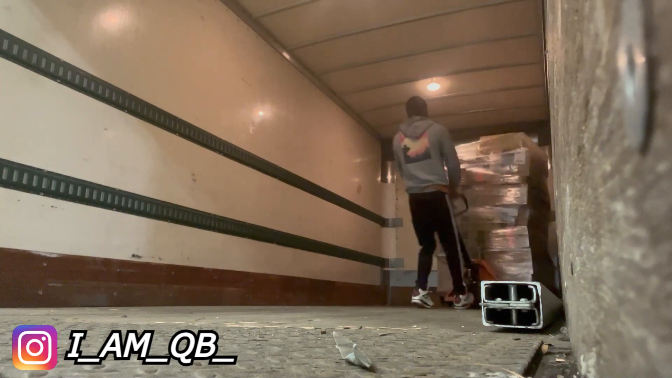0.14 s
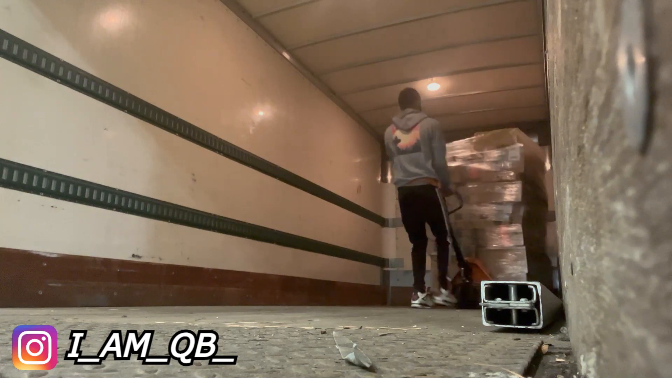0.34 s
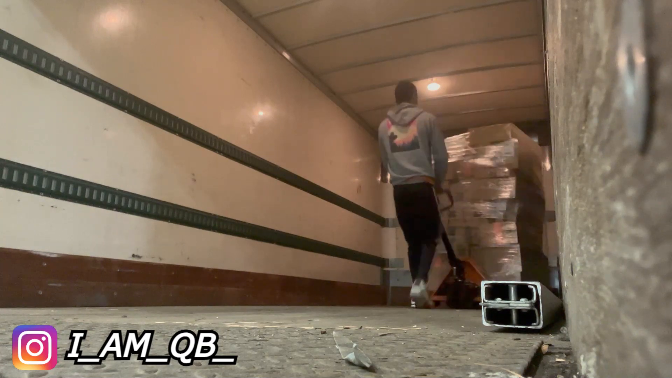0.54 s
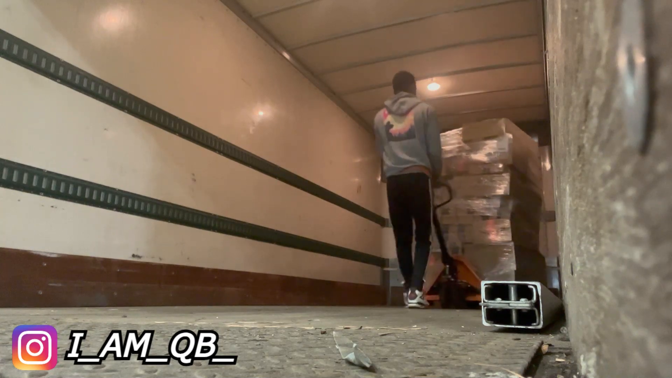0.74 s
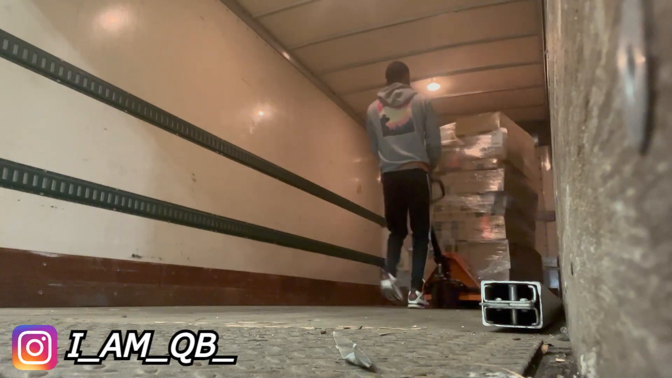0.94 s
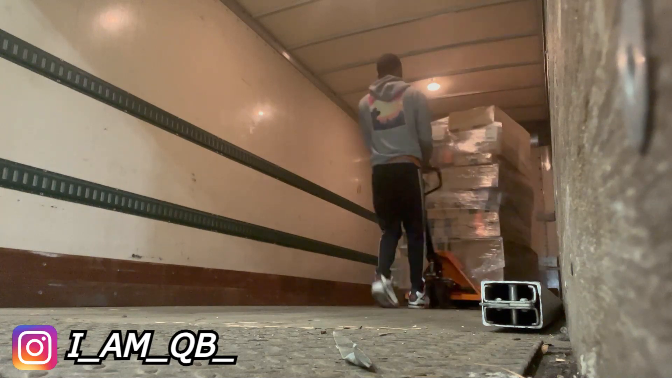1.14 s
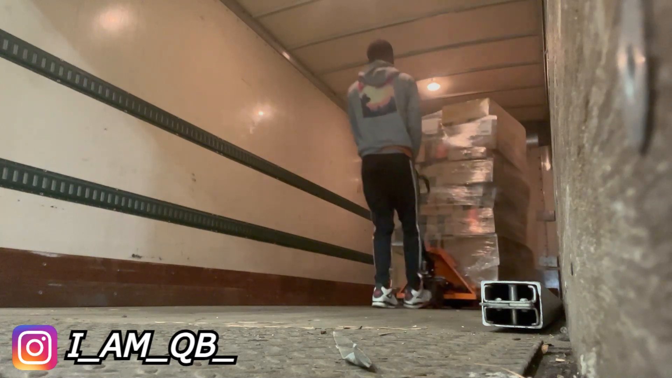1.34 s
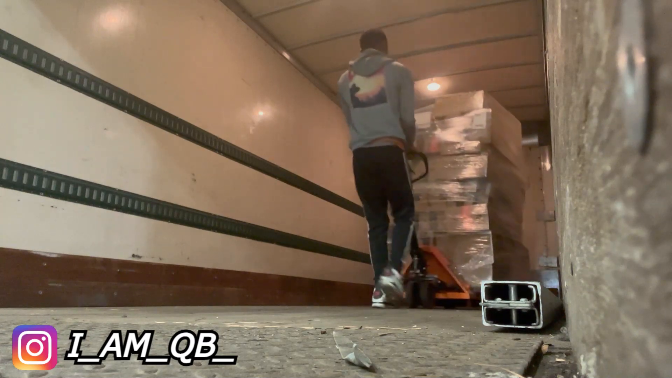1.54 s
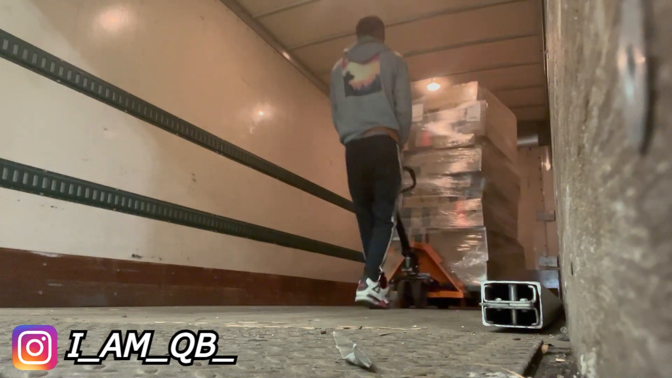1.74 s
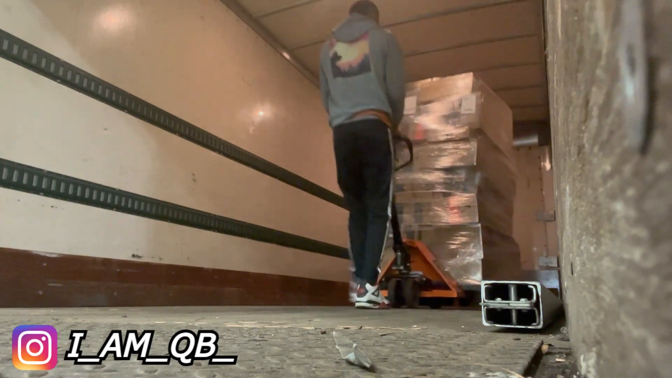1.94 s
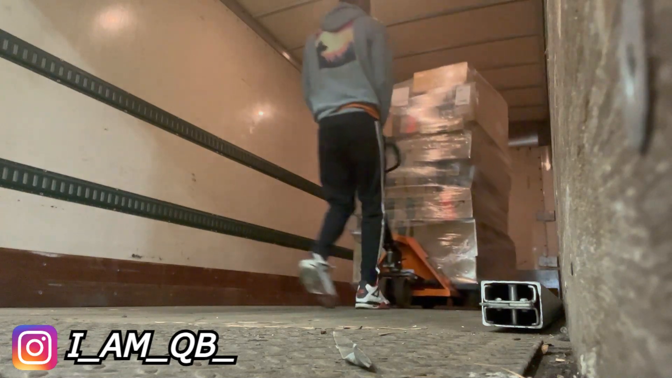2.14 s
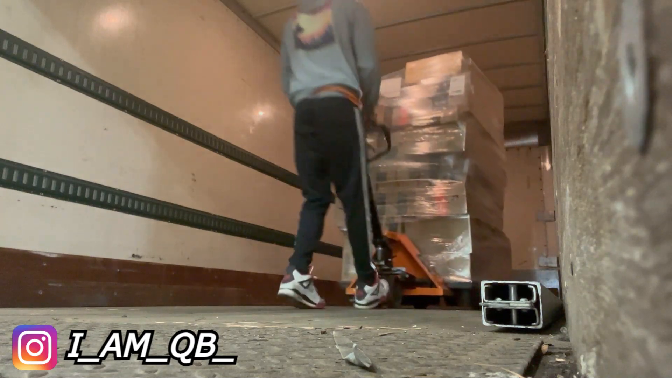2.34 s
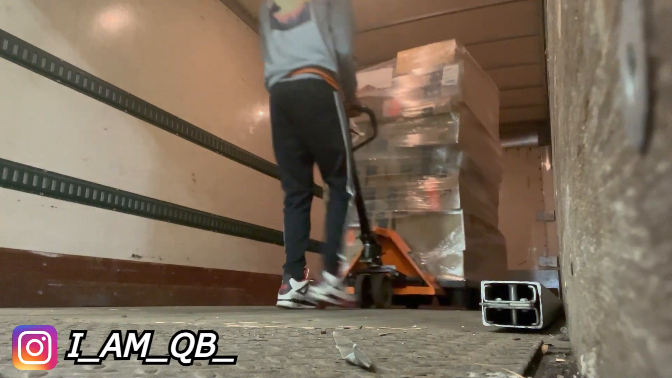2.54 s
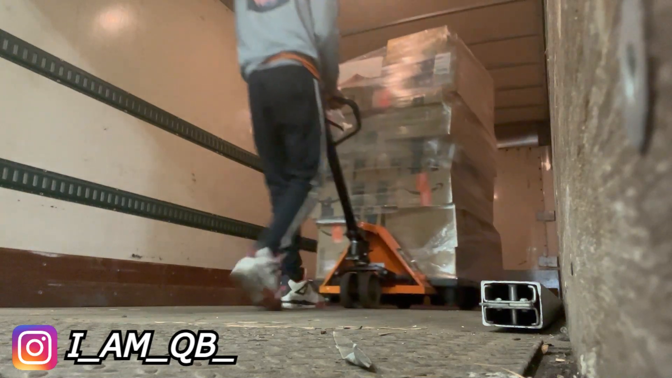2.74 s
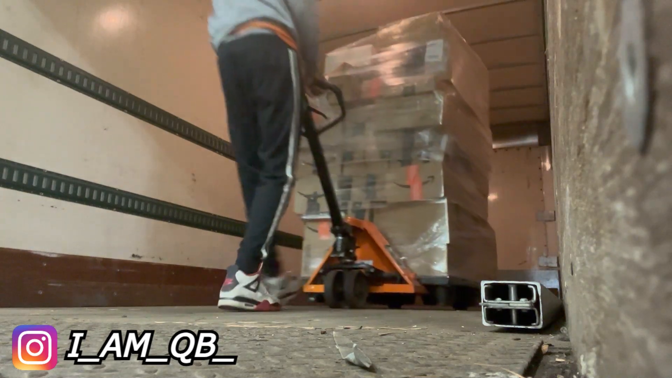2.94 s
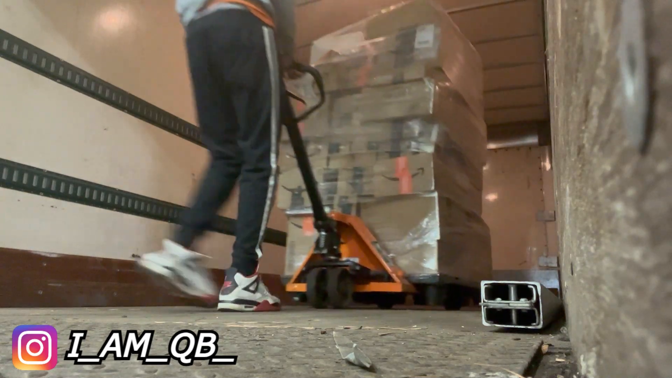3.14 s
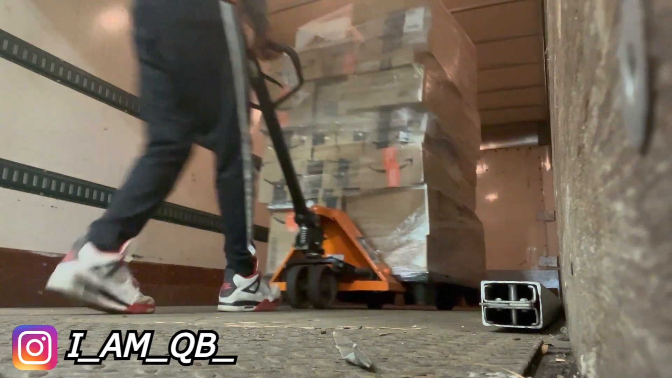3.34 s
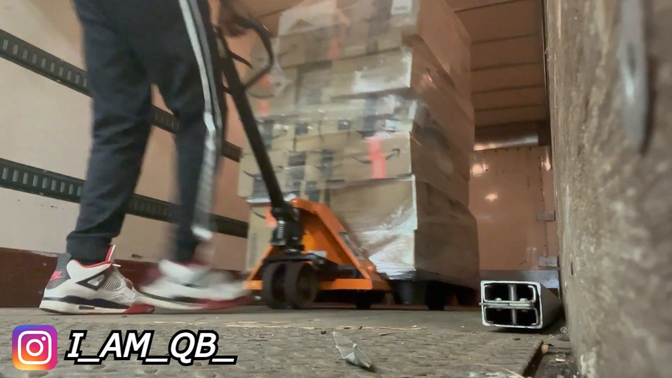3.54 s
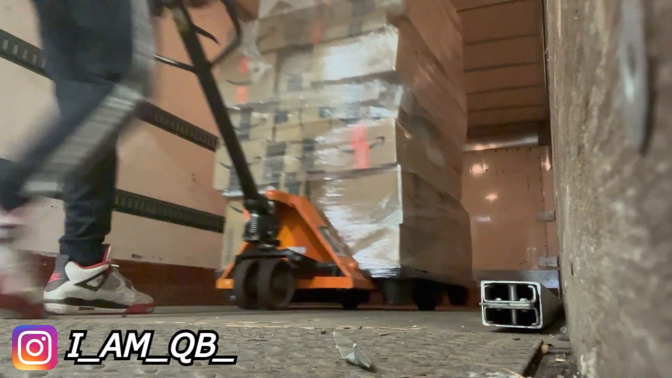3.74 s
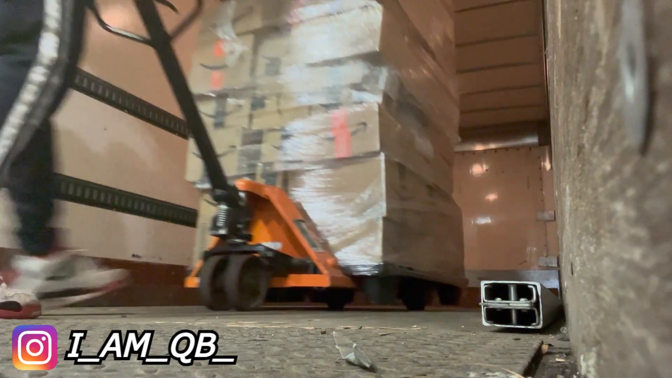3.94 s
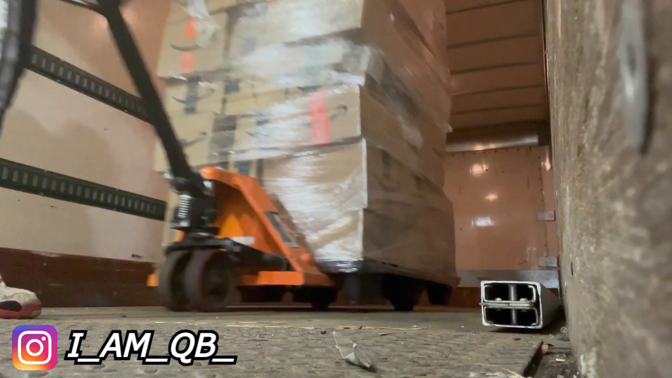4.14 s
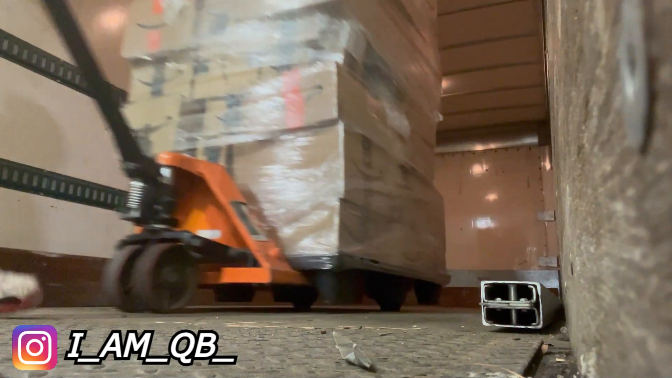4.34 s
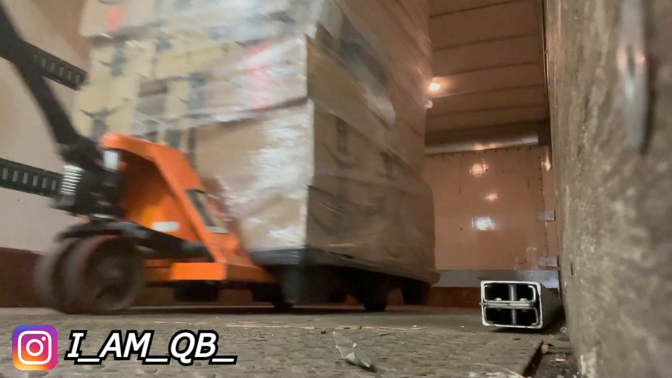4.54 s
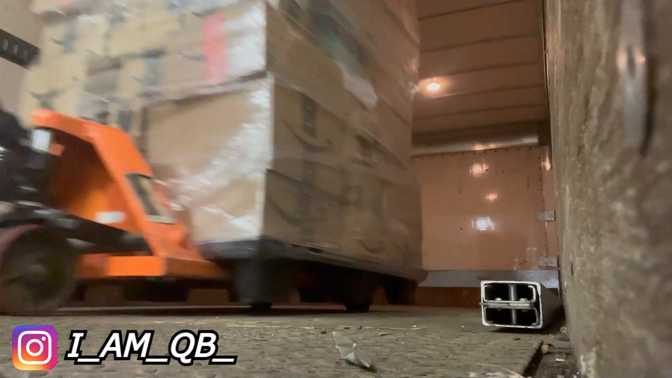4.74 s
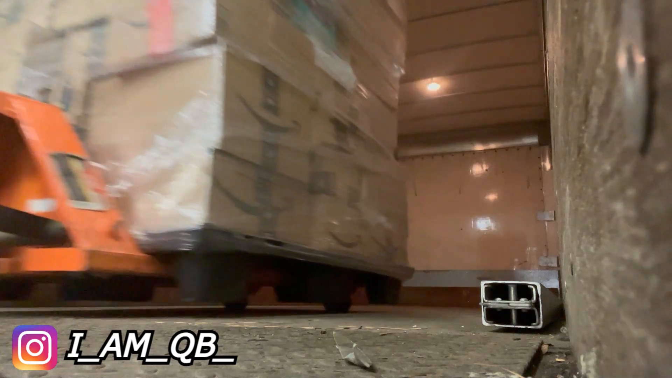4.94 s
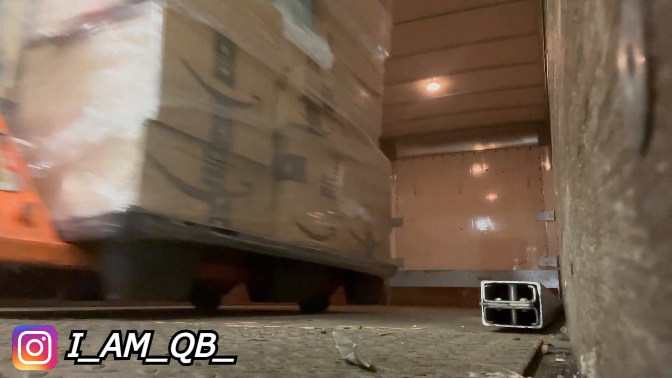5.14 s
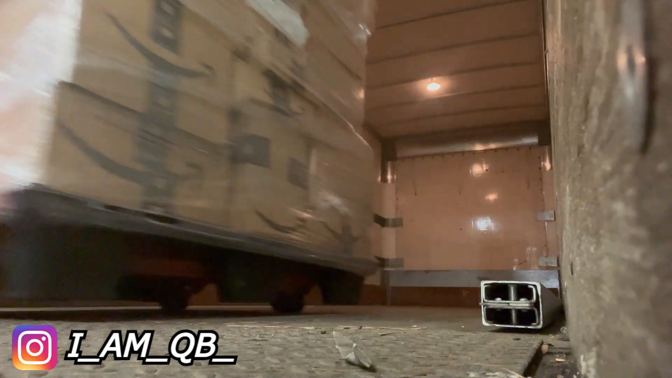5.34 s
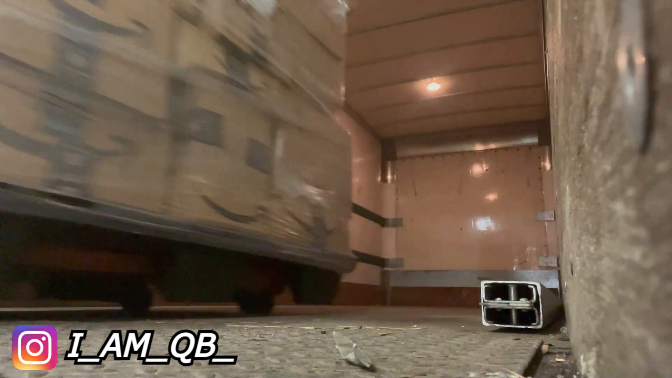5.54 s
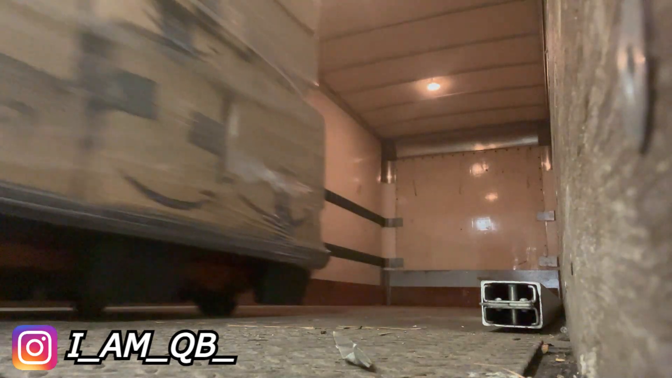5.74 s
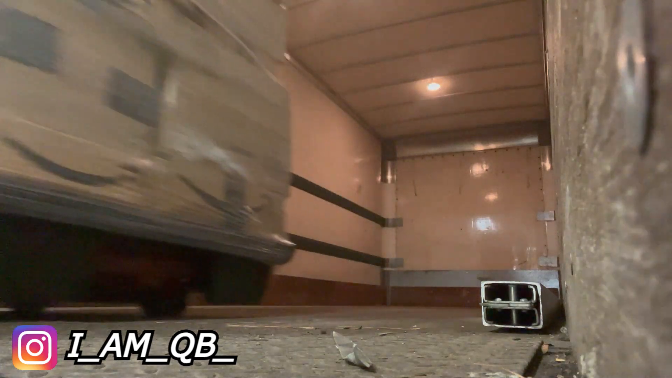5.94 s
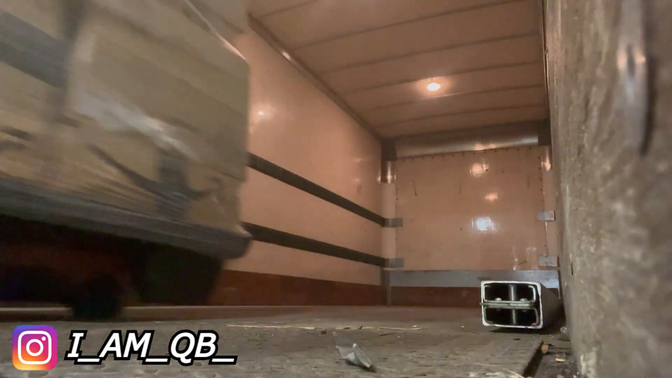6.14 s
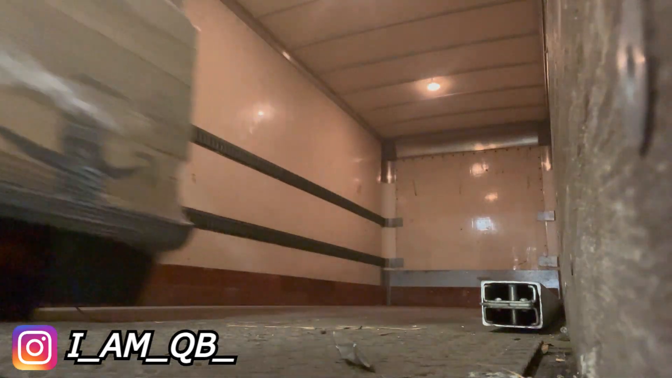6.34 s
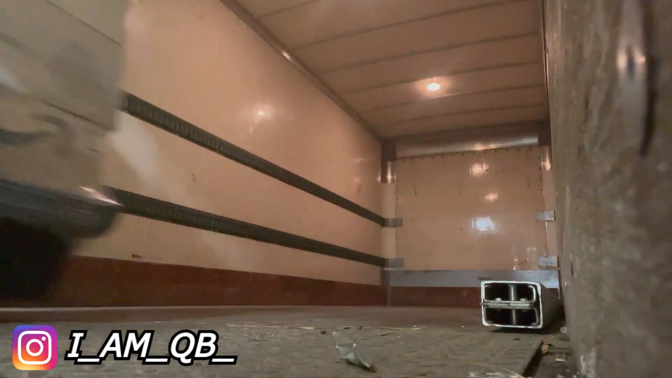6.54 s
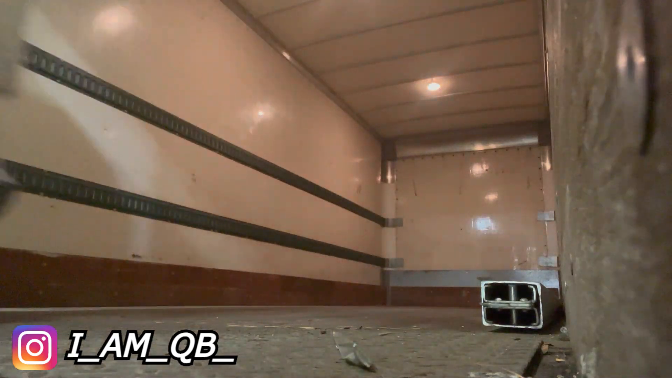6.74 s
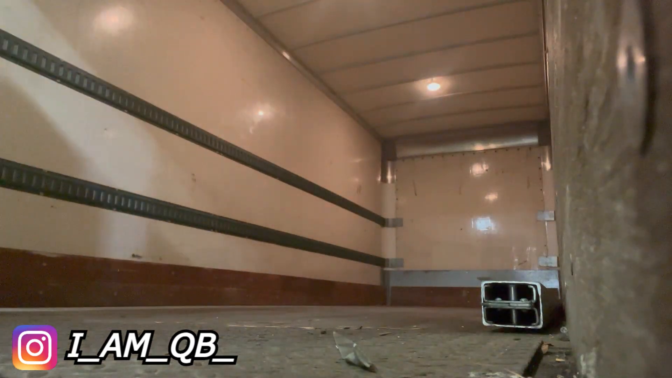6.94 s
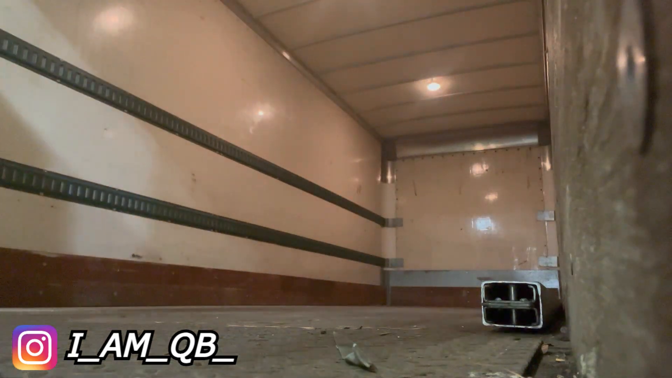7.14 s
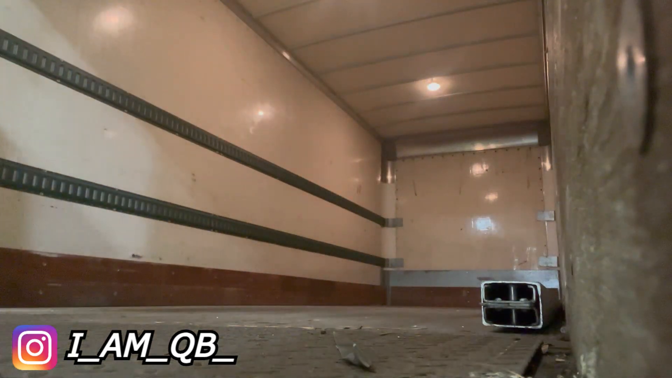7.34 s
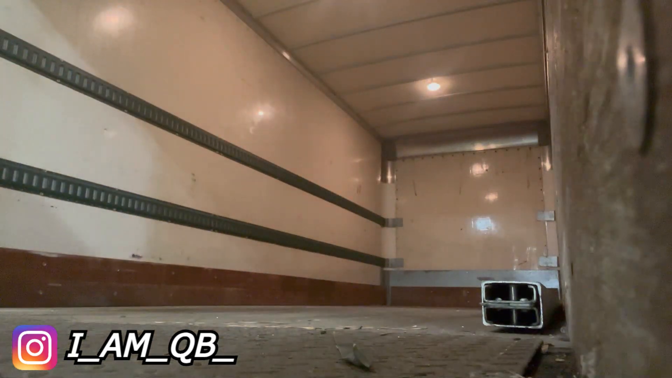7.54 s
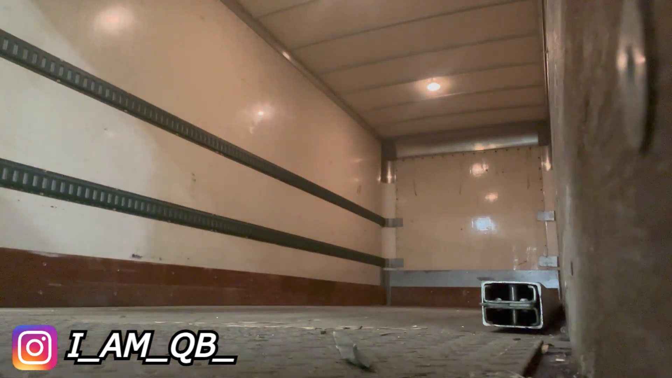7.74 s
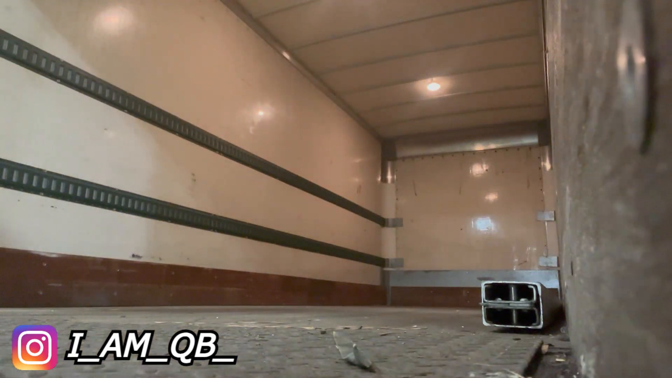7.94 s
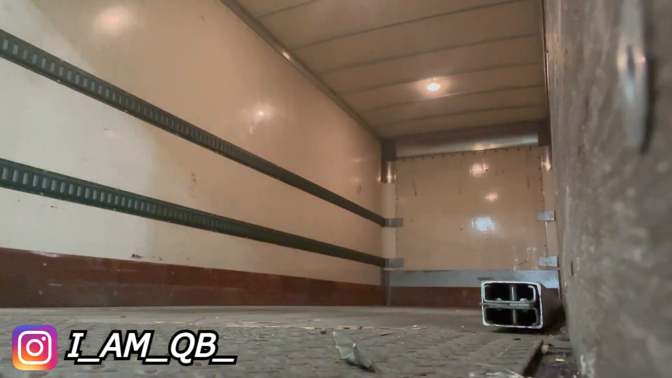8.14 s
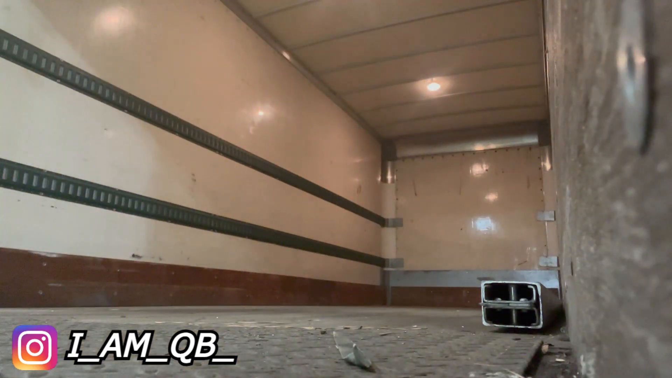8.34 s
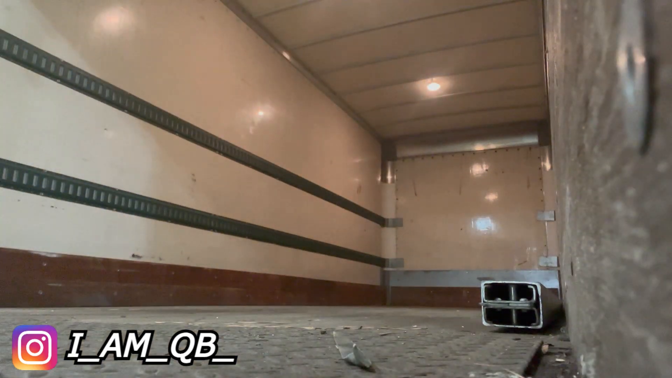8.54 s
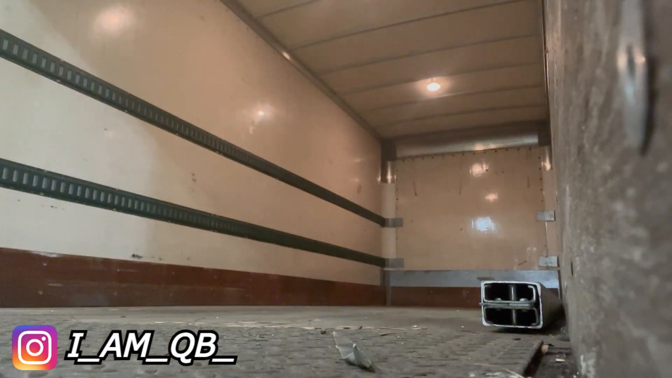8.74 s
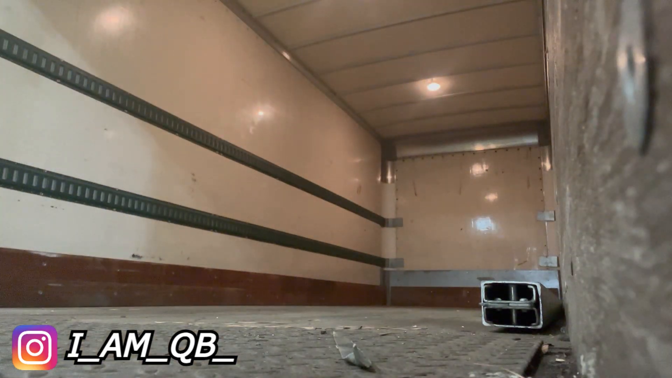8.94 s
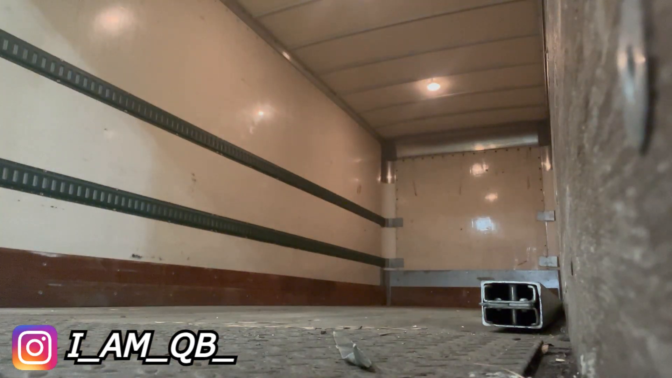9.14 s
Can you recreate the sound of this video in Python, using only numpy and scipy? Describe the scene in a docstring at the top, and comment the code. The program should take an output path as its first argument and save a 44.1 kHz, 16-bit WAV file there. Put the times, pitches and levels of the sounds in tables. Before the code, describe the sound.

A hand pallet jack with a heavy load rolls up a long reverberant trailer towards a microphone near the floor. Wheels rumble low and gritty, one ticking about four times a second, with floor thuds. Around the middle it passes close with hard steel clanks, rattling linkage and floor groans, then bumps out past the microphone and fades. A diesel idles in a low drone under airy hiss.

```python
"""In a long box trailer at a loading yard, a loaded pallet jack rolls past a microphone and out over the tail.
Noise shaped by floor modes is the rumble of its wheels; a flat spot on one wheel ticks once a turn.
Contact forces driven through resonant bodies give thuds at floor joints, fork clanks and linkage rattles.
A dry bearing rasps as wandering narrow-band noise, and groans are brief low tones of the floor.
An idling diesel is a sum of firing orders; yard air is coloured noise; the trailer adds reverberation."""
import sys
import numpy as np
from scipy import signal
from scipy.fft import rfft, irfft, next_fast_len
from scipy.io import wavfile
from scipy.ndimage import map_coordinates

SR = 44100
rng = np.random.default_rng(int(sys.argv[2]) if len(sys.argv) > 2 else 0)


def to_wav(sig):
    """Store sig (one row per channel, or 1-D mono) as 16-bit WAV at the path in sys.argv[1].

    Samples outside -1..1 are clipped; the rate is SR.
    """
    pcm = np.clip(np.atleast_2d(sig), -1, 1) * 32767
    pcm = np.round(pcm).astype(np.int16)
    wavfile.write(sys.argv[1], SR, pcm.T)  # frames by channels


N = 406161
T = np.arange(N) / SR


def amp(db):
    """Level to gain: 20 dB is a factor of ten in amplitude."""
    return 10 ** (np.asarray(db) / 20)


def unit(x):
    """Normalization to an rms amplitude of 1."""
    return x / np.sqrt(np.mean(x ** 2) + 1e-20)


def in_time(rows):
    """Linear interpolation of each column of a curve at every sample."""
    s, *columns = np.transpose(rows)
    return [np.interp(T, s, c) for c in columns]


def at_time(rows, s):
    """Linear interpolation of the first column of a curve at time s."""
    return np.interp(s, *np.transpose(rows)[:2])


def at_hz(points, hz):
    """Interpolation of a spectrum on a logarithmic frequency axis."""
    f, value = np.transpose(points)
    return np.interp(np.log(np.maximum(hz, 1)), np.log(f), value)


def drift(rate):
    """Slow random modulation of rms 1: a smooth curve through random knots, rate of them per second."""
    knots = rng.standard_normal(2000)
    places = np.arange(N // 100 + 2) * 100 * rate / SR
    curve = unit(map_coordinates(knots, [places], mode="wrap"))
    return curve[np.arange(N) // 100]


def swell(attack_s, hold_s, release_s):
    """An envelope with linear attack, hold and exponential decay."""
    t = T[:SR]
    return np.minimum(t / attack_s, 1) * np.exp(-np.maximum(t - attack_s - hold_s, 0) / release_s)


def resonate(x, hz, width):
    """Simple resonance: a two-pole band-pass with a gain near 1 at its top."""
    r = np.exp(-np.pi * width / SR)
    zeros = np.array([1, 0, -1]) * (1 - r * r) / 2
    poles = [1, -2 * r * np.cos(2 * np.pi * hz / SR), r * r]
    return signal.lfilter(zeros, poles, x + 1e-18)


def wandering(x, hz, width, wander):
    """Amplitude modulation of a carrier by low-passed noise; the carrier strays by the share wander."""
    slow = signal.sosfilt(signal.butter(2, width, fs=SR, output="sos"), x)
    return unit(slow) * np.cos(2 * np.pi * hz * np.cumsum(1 + wander * drift(28)) / SR)


def shelf(x, hz, low_db, high_db):
    """First-order crossover with separate gains below and above its corner."""
    low = signal.lfilter(*signal.butter(1, hz, fs=SR), x)
    return amp(low_db) * low + amp(high_db) * (x - low)


def body(x, spectrum, modes=(), size=8192):
    """Impulse response of a struck body: minimum-phase colour plus modes, keeping white-noise power."""
    cepstrum = irfft(np.log(amp(at_hz(spectrum, np.fft.rfftfreq(size, 1 / SR)))))
    # folding the cepstrum onto positive times makes the response causal
    cepstrum[1:size // 2] *= 2
    cepstrum[size // 2 + 1:] = 0
    knock = irfft(np.exp(rfft(cepstrum)))
    for hz, width, lift_db in modes:
        knock = knock + (amp(lift_db) - 1) * resonate(knock, hz, width)
    knock = knock / np.linalg.norm(knock)
    return signal.oaconvolve(np.atleast_2d(x), knock[None], axes=1)[:, :N]


# stereo width of a diffuse field: (frequency [Hz], side minus mid [dB])
FIELD_WIDTH = [(30, -18), (70, -20), (170, -12.5), (290, -8.5), (400, -6.5), (560, -1), (800, 3.5),
               (1200, 1.5), (2000, -1.5), (4500, 1), (12000, 0)]


def diffuse(size=N):
    """Diffuse-field noise at two spaced microphones: coherent in the bass, partly opposed near 800 Hz."""
    padded = next_fast_len(size, True)
    wide = amp(at_hz(FIELD_WIDTH, np.fft.rfftfreq(padded, 1 / SR)))
    mid, side = rfft(rng.standard_normal((2, padded)))
    pair = (mid + wide * side * [[1], [-1]]) / np.sqrt(1 + wide ** 2)
    return irfft(pair, padded)[:, :size]


def contact(chatter_s, snap, lead_s=0.0054, lead_db=-6, lumpy_db=2.5, hops_per_s=900, hop_db=1, size=8192):
    """Contact force of an impact: a swelling scrape, a hard touch (snap), then decaying chatter."""
    touch = size // 8
    t = (np.arange(size) - touch) / SR
    lumps = amp(lumpy_db * np.clip(rng.standard_normal(size // 64), -1.5, 1.5))
    scrape = amp(lead_db) * np.exp(-abs(t) / lead_s)
    chatter = np.exp(-abs(t) / max(chatter_s, .001))
    shape = np.where(t < 0, scrape, chatter)
    hops = unit((rng.random(size) < hops_per_s / SR) * rng.choice([-1, 1], size))
    grain = rng.standard_normal(size) + amp(hop_db) * hops
    force = unit(grain * np.repeat(lumps, 64) * shape) * np.sqrt(np.mean(shape ** 2))
    force[touch] += snap
    return force


def add(track, s, sound, lead=1024):
    """Superposition: mix a sound in so that its sample number lead falls at time s."""
    i = max(round(s * SR) - lead, 0)
    track[i:i + len(sound)] += sound[:N - i]


# spectrum of the yard air: (frequency [Hz], density [dB per Hz])
YARD_SPECTRUM = [(100, -28), (170, 10), (229, 10.5), (822, -10.5), (1030, -2.5), (2160, -25), (3360, -24.5),
                 (4440, -26.5), (4960, -28), (6800, -40), (9860, -56), (14300, -49)]
# hiss in the yard air: (time [s], level relative to the air [dB])
YARD_HISS_LEVEL = [(0, 11), (3, 5.5), (6, 17.5), (8.0, 4), (8.7, 5.5), (9.21, 14.5)]


def yard(air_db=-40, hiss_hz=2800):
    """Ambient noise: spectrally shaped diffuse air with a treble hiss that comes and goes."""
    air = unit(body(diffuse(), YARD_SPECTRUM))
    return amp(air_db) * shelf(air, hiss_hz, 0, at_time(YARD_HISS_LEVEL, T))


# drone of the idling engine, with dips near 6 and 7 s: (time [s], level [dB])
DRONE_LEVEL = [(0, -24), (3.5, -22), (5.75, -24), (5.92, -34), (6.25, -26.5), (7.08, -24), (7.22, -39),
               (7.54, -27.5), (9.21, -29)]
# harmonic orders of the firing rate: (multiple, relative level [dB])
FIRING_ORDERS = [(1, -18.5), (2, 0), (3, -3), (4, -6.5), (5, -16.5)]


def engine(firing_hz=30.04, waver_db=1.36, unsteady=0.00407):
    """Harmonic series of a diesel's firing rate; dispersed phases smear the firings into an even drone."""
    level, = in_time(DRONE_LEVEL)
    turn = 2 * np.pi * np.cumsum(firing_hz * (1 + unsteady * drift(4))) / SR
    orders = np.zeros(N)
    for k, db in FIRING_ORDERS:
        strength = amp(db + waver_db * drift(5.4))   # each order swells on its own
        orders += strength * np.sin(k * turn + np.pi * k ** 2 / 2)
    return np.sqrt(2) * amp(level) * orders


# reverberation of the trailer: (frequency [Hz], decay time for 60 dB [s])
REVERBERATION_TIME = [(60, 1), (250, 0.29), (800, 1), (1700, 0.79), (4000, 0.69), (8000, 0.7),
                      (15000, 0.18)]


def trailer(x, build_s=0.0011, early_db=4, early_s=0.02, count=7):
    """Reverberation: strong early sound, then band-wise decay; the echo pattern changes as the jack moves."""
    t, hz, centres = T[:SR], np.fft.rfftfreq(SR, 1 / SR), np.geomspace(60, 15000, 9)
    bands = np.array([at_hz(np.c_[centres, share], hz) for share in np.eye(len(centres))])
    decays = np.exp(-np.log(1000) * t / at_hz(REVERBERATION_TIME, centres)[:, None])
    decays = decays * (1 - np.exp(-t / build_s)) * (1 + amp(early_db) * np.exp(-t / early_s))
    out = np.zeros((2, N + SR))
    for place in np.eye(count):
        # crossfade from one place's response to the next
        near = np.interp(T, np.linspace(0, T[-1], count), place)
        tail = (irfft(rfft(diffuse(size=SR))[:, None] * bands, SR) * decays).sum(axis=1)
        echo = signal.fftconvolve((x * near)[:, near > 0], unit(tail) / np.sqrt(SR), axes=1)
        start = np.argmax(near > 0)
        out[:, start:start + echo.shape[1]] += echo
    return out[:, :N]


def passing(x, lag_ms):
    """Interaural-type time difference: direct sound reaches the nearer side first (positive: right)."""
    lag = lag_ms * SR / 1000
    return np.array([map_coordinates(x, [np.arange(N) - side * lag / 2], order=2) for side in (1, -1)])


# rattles of handle and linkage: (time [s], relative level [dB], chatter [s], brightness [dB])
RATTLE_EVENTS = [(0.4762, -39.5, 0.014, -10.5), (.585, -49, .02, -8), (0.7548, -38, 0.015, 0),
                 (1.605, -33.5, 0.026, 4), (3.75, -37, 0.0064, 13), (4.5014, -25, 0.015, 1.5),
                 (4.838, -21.5, 0.0057, -8), (5.604, -33, 0.0084, 7), (5.62, -23.5, 0.0034, 0),
                 (5.751, -23.5, 0.0056, 1), (5.8293, -26.5, 0.0021, 14), (5.858, -36, 0.017, 0),
                 (6.409, -28.5, 0.011, 2.5), (6.929, -50, .006, -6), (6.953, -23, 0.0011, 4),
                 (7.138, -34.5, 0.0096, 15.5), (7.577, -35.5, 0.0037, -3), (7.667, -38.5, 0.013, 1),
                 (8.142, -48, .005, -5), (8.206, -47, 0.0055, -4), (8.254, -38, 0.014, -2),
                 (8.329, -47, .004, -6), (8.366, -38, 0.0037, -9)]
# colour of the linkage: (frequency [Hz], relative level [dB])
LINK_COLOUR = [(700, -20.5), (1700, 9.5), (2200, -2), (3100, 5), (3600, 0), (4300, 5.5), (5500, -4.5),
               (6500, -9), (7800, -24), (9300, -10), (12000, -23), (15000, -26.5)]
# modes of the linkage: (frequency [Hz], width [Hz], lift [dB])
LINK_RESONANCES = [(3300, 18, 2), (4040, 62, 3.4), (4470, 24, 2.7), (5050, 66, 3.5)]


def rattles(snap=5.8, gain_db=-3):
    """Repeated micro-impacts: loose pins of the handle chatter in their holes and excite the linkage."""
    force = np.zeros(N)
    for s, db, chatter_s, bright_db in RATTLE_EVENTS:
        add(force, s, amp(db) * shelf(contact(chatter_s, snap), 9600, -bright_db / 2, bright_db))
    return amp(gain_db) * body(force, LINK_COLOUR, LINK_RESONANCES)


# lift-linkage pins striking home:
# (time [s], relative level [dB], pitch [Hz], ring relative to the crack [dB], ring decay [s])
CLINK_EVENTS = [(0.488, -37, 3337, 3, 0.019), (0.498, -47, 3810, 5, 0.013), (0.873, -39, 2990, 4, .025),
                (0.89, -40, 3300, 1, 0.013), (1.632, -40, 3330, 2, .01), (1.611, -37, 4030, 0, .02),
                (4.6088, -25, 2910, 4, .006), (4.8378, -29, 4350, 14, 0.0065), (4.865, -27, 4100, -1, .005),
                (5.09, -28, 4240, -1, .006), (5.6215, -24, 4130, -7, 0.0053),
                (5.7046, -20.5, 2940, 8.5, .004), (5.718, -23, 2830, 7, .005), (5.749, -17, 2880, -1, .005),
                (5.759, -34, 3060, 15, .005), (5.7686, -28.5, 3910, 7, 0.0075),
                (5.78, -31, 4360, 14.5, 0.0036), (5.829, -18.5, 4630, 4, .003),
                (6.953, -28, 4320, 2.5, 0.0066), (7.669, -36, 4230, -5, 0.0055),
                (7.646, -30, 4400, -13, .006), (8.1107, -45, 4160, -1, .005), (8.1415, -41, 4800, 4, .003),
                (8.2, -37, 4270, -3, .003), (8.2094, -42, 4900, 0, .003), (8.269, -29, 4300, -2, 0.0041)]


def clinks(crack_s=0.0014, snap=2.8):
    """Free vibration after impact: a pin cracks on the linkage and rings briefly at its own pitch."""
    force, ring, t = np.zeros(N), np.zeros(N), T[:SR // 2]
    for s, db, hz, ring_db, ring_s in CLINK_EVENTS:
        add(force, s, amp(db) * contact(crack_s, snap, lead_db=-25))
        tone = np.sin(2 * np.pi * hz * t) * np.exp(-t / ring_s)
        add(ring, s, amp(db + ring_db) * tone, lead=0)
    return ring + body(force, LINK_COLOUR, LINK_RESONANCES)


# blows of the steel forks: (time [s], relative level [dB], treble [dB], chatter [s], relative blade ring [dB])
CLANK_EVENTS = [(4.8618, -6.5, 0, 0.0026, 4.5), (4.877, -12, 0, 0.0023, 3), (4.898, -21, 1, .003, -12),
                (4.92, -17, 0, 0.0069, -19), (4.955, -25, 9, 0.0091, -10), (4.94, -23, 1, 0.0034, -10),
                (5.621, -16, -9, 0.004, -6), (5.714, -9.5, -5, 0.012, -5), (5.749, -12.5, -3, 0.0055, 2),
                (5.7664, -22, -2, 0.0051, 14), (5.83, -7.5, 0, 0.0031, 2.5),
                (5.8616, -10.5, -18, 0.018, -6), (6.382, -14, -14, 0.0027, -11),
                (6.43, -29.5, 15.5, 0.012, 8.5), (6.516, -16.5, 2, 0.015, 0.5),
                (6.5455, -18.5, -7, 0.024, -3), (7.3459, -14, 4, 0.0045, -0.5),
                (7.3655, -17, -9, 0.003, -1), (7.378, -27, -2.5, 0.16, -14), (7.696, -34.5, -2, 0.028, 7),
                (8.0617, -32.5, -7, 0.0049, 7), (8.2595, -18, 7.5, 0.013, -4),
                (8.2762, -16.5, -1, 0.011, 2), (8.303, -18, 2, 0.015, -7), (8.329, -19.5, 1, 0.008, -5),
                (8.345, -19.5, 3.5, 0.0072, -10), (8.364, -25, 1, 0.055, -10)]
# colour of the forks: (frequency [Hz], relative level [dB])
FORK_COLOUR = [(120, -16), (300, 2.5), (620, 5.5), (800, 4.5), (1100, -2.5), (1300, -2), (1800, -14),
               (2150, -18.5), (2800, -15), (3400, -16), (4600, -20), (5700, -26), (8500, -38.5),
               (15000, -47)]
# modes of the forks: (frequency [Hz], width [Hz], lift [dB])
FORK_RESONANCES = [(613, 120, 4.4), (2200, 45, 5.1), (3370, 35, 2.1), (4370, 60, 3), (4460, 36, 2.8)]
# ring of the fork blades: (frequency [Hz], width [Hz], relative level [dB])
BLADE_MODES = [(890, 98, -4.5), (1130, 100, -15), (1385, 43, -8), (1533, 72, 0.5), (1728, 120, 4),
               (1806, 208, -1), (2310, 140, -13.5)]


def clanks(snap=6.9, square_snap=11.6, lead_db=-13, square_db=-4.0, gain_db=-2, ring_db=11):
    """Modal excitation: the forks jump and strike steel; a square blow sets their blades ringing."""
    force, square = np.zeros(N), np.zeros(N)
    for s, db, treble_db, chatter_s, blade_db in CLANK_EVENTS:
        blow = contact(chatter_s, snap, lead_s=0.0043, lead_db=lead_db)
        add(force, s, amp(db) * shelf(blow, 2800, 0, treble_db))
        square_blow = contact(chatter_s, square_snap, lead_s=0.0034, lead_db=lead_db)
        add(square, s, amp(db + blade_db + square_db) * square_blow)
    ring = np.zeros(N)
    for k, (hz, width, db) in enumerate(BLADE_MODES):
        ring += (-1) ** k * amp(db) * resonate(square, hz, width)
    return amp(gain_db) * body(force, FORK_COLOUR, FORK_RESONANCES) + amp(ring_db) * ring


# bands of the rasp: (frequency [Hz], width [Hz], relative level [dB])
RASP_BANDS = [(11650, 110, 5), (11550, 130, 0.5), (11900, 110, -3.5), (12200, 1100, 4.5), (14200, 200, -16)]
# catches of the dry bearing: (time [s], length [s], rasp level [dB], whistle relative to the rasp [dB])
RUB_EVENTS = [(0.184, 0.039, -73, 18), (0.69, 0.066, -63, 13), (0.948, 0.021, -53, 6),
              (4.974, 0.069, -40.5, -1), (5.12, 0.25, -60, -10), (5.31, 0.47, -58, 6),
              (5.665, 0.027, -39.5, -1), (5.728, .005, -44, -10), (6.314, 0.25, -56, -11)]


def bearing(flutter_db=1.5, whistle_hz=4980, whistle_width=200, attack_s=0.004, release_s=0.06,
            running_db=-57, running_whistle_db=-49, turn_db=-44, turn_hold_s=.025, wander_db=5, stray=0.0072):
    """Dry friction: a high unsteady rasp over a thin whistle, following the load and its catches."""
    load = at_time(FLOOR_DRIVE, T) + wander_db * drift(6.5)
    grip, squeal = amp(load + running_db), amp(load + running_whistle_db)
    for s, length, db, whistle_db in RUB_EVENTS:
        catch = amp(db) * swell(attack_s, length, release_s)
        add(grip, s, catch, lead=0)
        add(squeal, s, amp(whistle_db) * catch, lead=0)
    for s, db, *_ in TICK_EVENTS:   # every tick also loads the bearing a little
        add(grip, s, amp(db + turn_db) * swell(attack_s, turn_hold_s, release_s), lead=0)
    grain = unit(amp(flutter_db * drift(120)))
    rasp = sum(amp(db) * wandering(rng.standard_normal(N), hz, width, stray) for hz, width, db in RASP_BANDS)
    whistle = wandering(rng.standard_normal(N), whistle_hz, whistle_width, stray)
    return grain * (grip * unit(rasp) + squeal * unit(whistle))


# groans of the loaded floor: (centre time [s], length [s], frequency [Hz], level [dB])
GROAN_EVENTS = [(2.853, 0.31, 136, -27), (2.942, 0.26, 326, -27.5), (4.395, 0.19, 159, -32),
                (4.516, 0.14, 179, -17), (5.345, 0.068, 66.5, -15.5), (6.305, 0.078, 55.2, -18),
                (6.631, 0.43, 109.3, -21.5), (7.027, 0.16, 109.3, -18), (8.02, 0.18, 72, -17.5)]


def groans(waver=0.01615):
    """Forced vibration of one floor mode: a low tone under a Gaussian envelope, slightly unsteady in pitch."""
    out, sway = np.zeros(N), np.cumsum(1 + waver * drift(11)) / SR
    for s, length, hz, db in GROAN_EVENTS:
        near = abs(T - s) < 2 * length
        envelope = np.exp(-(2 * (T[near] - s) / length) ** 2)
        out[near] += np.sqrt(2) * amp(db) * envelope * np.sin(2 * np.pi * hz * sway[near])
    return out


# touches of the flat spot, once a turn:
# (time [s], relative level [dB], ring pitch [Hz], scrape before [s], chatter after [s], treble [dB])
TICK_EVENTS = [(0.8571, -35.5, 2980, 0.0014, 0.032, 4), (1.123, -42, 2470, .005, .022, 2),
               (1.379, -56, 2680, .005, 0.016, -4), (1.630, -39, 2820, 0.0034, .016, 5),
               (1.8814, -35.5, 2850, 0.0025, .015, -7.5), (2.134, -37, 2650, 0.0026, 0.025, 5),
               (2.388, -46.5, 2750, 0.008, 0.015, -9), (2.635, -29.5, 2730, 0.0039, 0.014, -1.5),
               (2.889, -25.5, 2750, 0.0039, 0.0066, 2), (3.141, -22, 2815, 0.0018, 0.0058, 5),
               (3.388, -27.5, 2870, .003, 0.023, 2), (3.632, -26.5, 2660, 0.0027, 0.013, 0),
               (3.874, -31, 2700, 0.0041, 0.015, -13.5), (4.115, -20, 2920, 0.0024, 0.015, -2.5),
               (4.355, -19.5, 2780, 0.0018, 0.0067, 1), (4.596, -21.5, 2890, 0.0017, 0.0087, 8),
               (4.8396, -25, 2870, .003, 0.0062, -6), (5.087, -28.5, 2660, .002, 0.0064, -1),
               (5.354, -33, 2730, 0.01, 0.0092, -7), (5.62, -31, 2850, 0.0058, .01, 0)]
# colour of the wheel: (frequency [Hz], relative level [dB])
WHEEL_COLOUR = [(300, -11.5), (800, -3.5), (1300, 5), (1800, 1), (2120, -13), (2750, 0.5), (3150, -1.5),
                (3650, -7.5), (4300, -6), (5200, -11.5), (7200, -36), (8700, -33), (11000, -31),
                (15000, -61)]
# modes of the wheel: (multiple of the ring pitch, width [Hz], lift [dB])
WHEEL_MODES = [(.79, 40, 8.5), (1, 90, 8.5), (1.09, 90, -0.5), (1.165, 70, 2), (1.48, 220, 6),
               (1.61, 160, 1)]


def ticks(snap=7.9, low_ring_db=-15, low_follows=0.42, rebound_s=.014, rebound_db=-8):
    """Impact and rebound once a turn: a bright tick over a low ring that grows more slowly with strength."""
    out = np.zeros(N)
    for s, db, pitch, scrape_s, chatter_s, treble_db in TICK_EVENTS:
        strike, rebound = (contact(chatter_s, snap, lead_s=scrape_s, lead_db=0, hops_per_s=500, hop_db=0)
                           for _ in range(2))
        delay = round(rebound_s * rng.uniform(.7, 1.6) * SR)
        force = strike + amp(rebound_db) * np.roll(rebound, delay)
        force = shelf(force, 1300, low_ring_db + low_follows * db, db)
        force = shelf(force, 4500, -treble_db / 2, treble_db)
        modes = [(k * pitch, width, lift_db) for k, width, lift_db in WHEEL_MODES]
        add(out, s, body(force, WHEEL_COLOUR, modes)[0])
    return out[None]


# wheels striking the floor, at joints and as strong flat-spot thumps just before some ticks: # (time [s],
# relative level [dB], panel pitch [Hz], relative deep boom [dB], relative hard slap [dB])
FLOOR_BLOWS = [(.2675, -22, 397, -10, 6.5), (.322, -30, 231, -9, 7), (1.095, -23.5, 344, -17, 8),
               (1.348, -25, 307, -5, 3), (1.619, -13, 286, -10, -4.5), (2.336, -18.5, 239, -11, -4.5),
               (2.612, -24, 262, 1, 4.5), (2.882, -19, 301, -14, -1.5), (3.865, -19, 227, -9, -7.5),
               (4.281, -25, 254, -4, 6), (4.333, -18.5, 244, 11, 3), (4.496, -7, 222, -10, -2),
               (4.574, -24, 258, -1, 10), (4.863, -15.5, 217, 5, 5.5), (4.971, -11.5, 209, 1.5, 2),
               (5.593, -25.5, 226, -3, 6), (5.665, -8, 260, 3, 3), (5.712, -14, 364, 6.5, 6),
               (5.749, -9.5, 160, -1.5, -16), (5.789, -17, 164, 13.5, 3), (6.3816, -10, 296, 7.5, 3),
               (6.418, -26, 167, 4, -10), (6.549, -20, 201, -9, -13), (7.1355, -7, 315, -17, 4.5),
               (7.156, -21, 249, -12, 7), (7.182, -14, 361, -7, 0.5), (7.212, -24, 293, -5, 14),
               (7.266, -22, 293, -12, 1), (7.349, -18.5, 348, 2, 2), (7.362, -20.5, 172, 9, -6),
               (7.552, -24.5, 234, -11, 6.5), (8.30, -14.5, 239, -12, -4), (8.364, -22.5, 202, -5, 1)]


def jolts(lead_s=.017, thump_db=8.5, deep_db=1, slap_db=-11):
    """Impulsive excitation of the floor: the listed blows, and a thump before each tick that follows the
    rumble."""
    thumps = [(s - lead_s, at_time(FLOOR_DRIVE, s) + thump_db, at_time(FLOOR_PITCH, s), deep_db, slap_db)
              for s, *_ in TICK_EVENTS]
    return list(FLOOR_BLOWS) + thumps


# colour of the slap on the floor: (frequency [Hz], relative level [dB])
SLAP_COLOUR = [(60, -14), (160, -13.5), (300, 7), (450, 5), (750, -4), (1000, -17.5), (1300, -32.5),
               (1750, -18), (2200, -52), (4500, -37.5), (8000, -50), (15000, -58.5)]


def thuds(slap_chatter_s=.009, slap_snap=22.0, swell_s=.0045, panel_db=2, overtone=2.385, overtone_db=-10,
          overtone_s=0.0038, boom_hz=84, boom_s=0.023, boom_db=-6, slap_db=-8.5):
    """Damped plate vibration: a blow slaps the floor, rings its panel and overtone, and flexes the deck."""
    force, flex, t = np.zeros(N), np.zeros(N), T[:SR // 2]
    for s, db, hz, deep_db, hard_db in jolts():
        add(force, s, amp(db + hard_db) * contact(slap_chatter_s, slap_snap, lead_db=-18.0))
        envelope = t / swell_s * np.exp(1 - t / swell_s)   # peaks at swell_s
        panel = amp(panel_db) * np.sin(2 * np.pi * hz * t) * envelope
        knock = amp(hard_db + overtone_db) * np.sin(2 * np.pi * overtone * hz * t) * np.exp(-t / overtone_s)
        deck = amp(deep_db + boom_db) * np.sin(2 * np.pi * boom_hz * t) * np.exp(-t / boom_s)
        add(flex, s, amp(db) * (panel + knock + deck), lead=0)
    blows = flex + amp(slap_db) * body(force, SLAP_COLOUR)
    return signal.sosfilt(signal.butter(2, 45, "high", fs=SR, output="sos"), blows)


def rocking(attack_s=0.0051, hold_s=0.046, settle_s=0.027):
    """Energy summation: each jolt rocks the load until it settles; strengths on the panels and the deck."""
    panels, deck, shape = np.zeros(N), np.zeros(N), swell(attack_s, hold_s, settle_s)
    for s, db, hz, deep_db, hard_db in jolts():
        add(panels, s, (amp(db) * shape) ** 2, lead=0)
        add(deck, s, (amp(db + deep_db) * shape) ** 2, lead=0)
    return np.sqrt(panels), np.sqrt(deck)


# drive of the wheels on the floor: (time [s], panel rumble [dB], deep boom [dB])
FLOOR_DRIVE = [(0.0, -29, -30), (1.36, -23, -23.5), (2.46, -24.5, -29), (2.87, -23.5, -23),
               (4.46, -21, -22.5), (5.57, -27, -21.5), (5.72, -27, -13.5), (6.08, -27.5, -26.5),
               (6.54, -20.5, -15.5), (6.82, -30.5, -21), (7.39, -26.5, -24), (8.18, -33, -23.5),
               (8.59, -40, -34), (9.21, -45.5, -37.5)]
# pitch of the floor under the wheels: (time [s], frequency [Hz])
FLOOR_PITCH = [(0, 293), (1.2, 270), (3.6, 264), (4.4, 220.5), (5.3, 217), (7.2, 245)]
# modes of the floor panels: (frequency [Hz], width [Hz])
PANEL_MODES = [(135, 25), (160, 22), (190, 14), (229, 16.3), (258, 17), (298, 33), (340, 28.4), (395, 53),
               (470, 123), (560, 150)]
# spectrum of the deck's boom: (frequency [Hz], density [dB per Hz])
BOOM_SPECTRUM = [(15, -34), (26, -23), (40, -14), (52, -1), (75, -3.5), (105, -1), (140, -4.5), (190, -16),
                 (300, -44), (600, -78.5)]
# spectrum of crushed grit: (frequency [Hz], density [dB per Hz])
GRIT_SPECTRUM = [(150, -13), (350, 4.5), (550, 5), (800, -1.5), (1150, -6.5), (1700, -11.5), (2100, -22),
                 (2800, -24), (3300, -24.5), (4100, -22), (5200, -29.5), (7000, -45), (11000, -40),
                 (15000, -67)]


def rolling(reach_octaves=0.57, bumps_db=2.0, grain_db=0.5, grit_db=-19.0, grit_follows=0.55, patch_db=1.85,
            rock_boom_db=-11, rock_rumble_db=-9, rock_grit_db=-19):
    """Roughness excitation: bumps shake the panels and crush grit over a steady deck boom; all surge while the
    load rocks."""
    rumble, boom = in_time(FLOOR_DRIVE)
    pitch, = in_time(FLOOR_PITCH)
    rock, deep_rock = rocking()
    bumps = drift(45)
    shake = diffuse() * amp(bumps_db * bumps)
    # modes near the current pitch take the larger shares
    shares = np.array([np.exp(-.5 * (np.log2(hz / pitch) / reach_octaves) ** 2) for hz, width in PANEL_MODES])
    shares /= np.linalg.norm(shares, axis=0)
    panels = np.zeros((2, N))
    for k, (hz, width) in enumerate(PANEL_MODES):
        panels += (-1) ** k * shares[k] * unit(resonate(shake, hz, width))
    panels = unit(signal.sosfilt(signal.butter(2, [110, 750], "band", fs=SR, output="sos"), panels))
    deck = unit(body(diffuse(), BOOM_SPECTRUM))
    grit_level_db = bumps_db * bumps / 2 + grain_db * drift(105) + patch_db * drift(15)
    crunch = unit(body(diffuse() * amp(grit_level_db), GRIT_SPECTRUM))
    # steady rolling and rocking add as energies
    return (np.hypot(amp(boom), amp(rock_boom_db) * deep_rock) * deck
            + np.hypot(amp(rumble), amp(rock_rumble_db) * rock) * panels
            + np.hypot(amp(grit_follows * rumble + grit_db), amp(rock_grit_db) * rock) * crunch)


# direction of the jack: (time [s], delay of the left side [ms])
LEFT_DELAY = [(0, 0.46), (1.7, 0.553), (2.2, 0.317), (3.8, 0.385), (4.3, 0.44), (4.7, -0.55), (9.2, -0.45)]
# sound filling the trailer, least as the load passes close by: (time [s], relative level [dB])
ECHO_SHARE = [(0, 1.5), (3.2, -3), (4.3, -6.5), (5.8, 0), (6.4, 0.5), (7.2, 1), (8.3, 1)]


def scene():
    """Superposition of direct sound, reverberant sound and the steady background."""
    tick, clank, rattle, clink, thud, rub = ticks(), clanks(), rattles(), clinks(), thuds(), bearing()
    direct = passing((tick + clank + rattle + clink + thud)[0], at_time(LEFT_DELAY, T))
    direct_rub = amp(-1.0) * passing(rub, lag_ms=-.272)
    sent = (amp(2.5) * tick + amp(2.0) * clank + amp(7.5) * rattle
            + amp(-1.5) * clink + amp(-3.0) * thud + amp(-4.0) * rub)
    echo = trailer(amp(at_time(ECHO_SHARE, T)) * sent)
    return direct + direct_rub + echo + rolling() + groans() + engine() + yard()


# balance of the two sides: (frequency [Hz], left minus right [dB])
SIDE_BALANCE = [(60, 4), (110, 0.5), (200, 1.5), (370, 4.5), (670, -0.5), (1230, 1), (2260, 0.5),
                (4130, 1.5), (7560, -1), (13800, 1)]


def record(dry, ceiling=.9, cutoff_hz=14300):
    """Transducer response: a left-right spectral balance, soft saturation of peaks and a steep low-pass."""
    size = next_fast_len(N + SR, True)
    half_db = at_hz(SIDE_BALANCE, np.fft.rfftfreq(size, 1 / SR)) / 2
    tilt = amp(half_db * np.array([[1], [-1]]))
    heard = irfft(rfft(dry, size) * tilt, size)[:, :N]
    rounded = heard / (1 + (heard / ceiling) ** 4) ** (1 / 4)
    return signal.sosfilt(signal.ellip(10, .1, 90, cutoff_hz, fs=SR, output="sos"), rounded)


dry = scene()
out = record(dry)
to_wav(out)
```